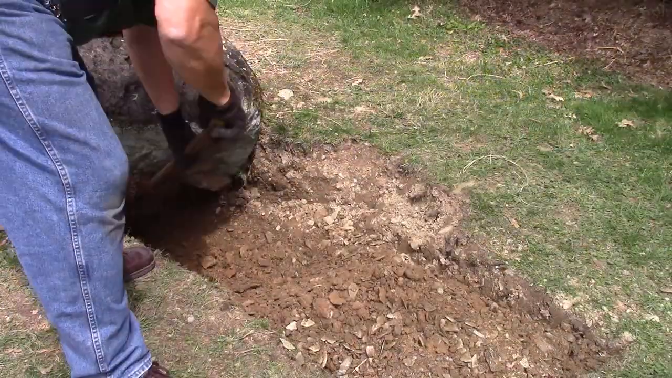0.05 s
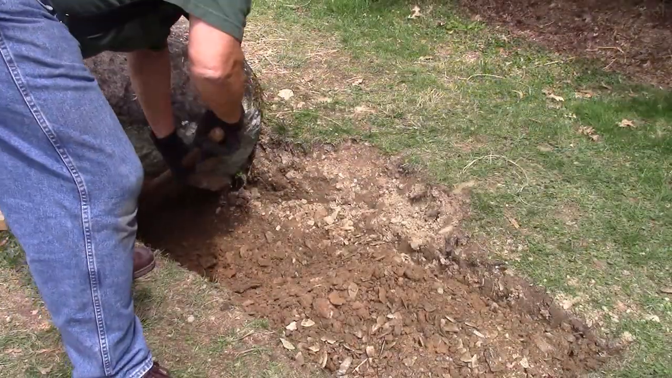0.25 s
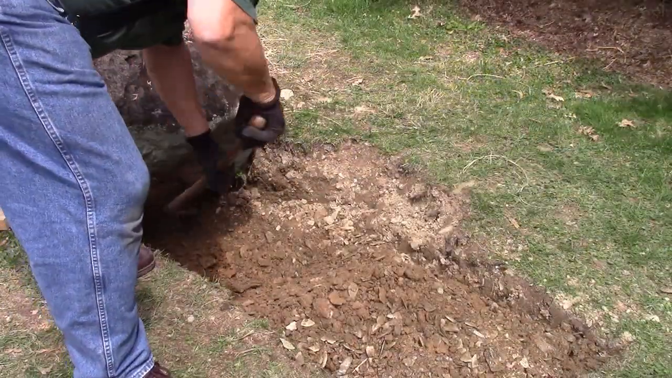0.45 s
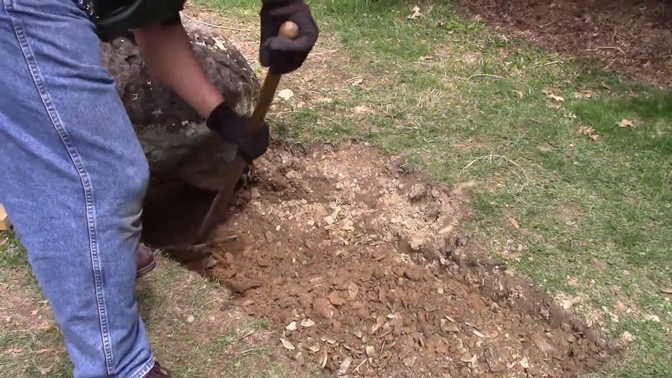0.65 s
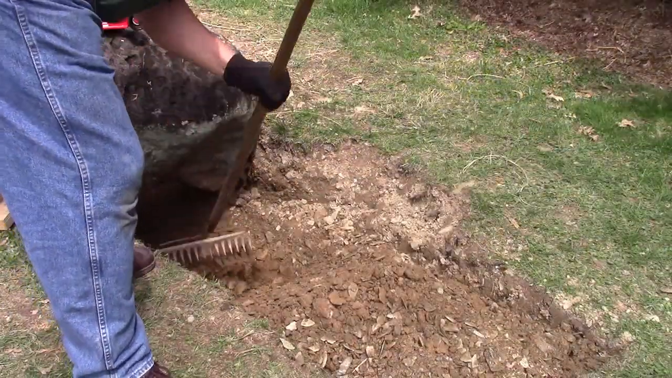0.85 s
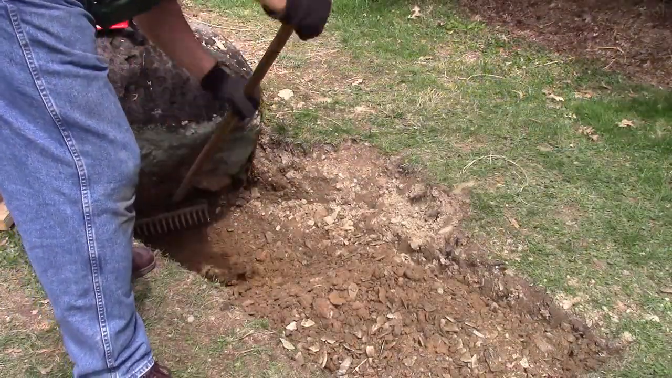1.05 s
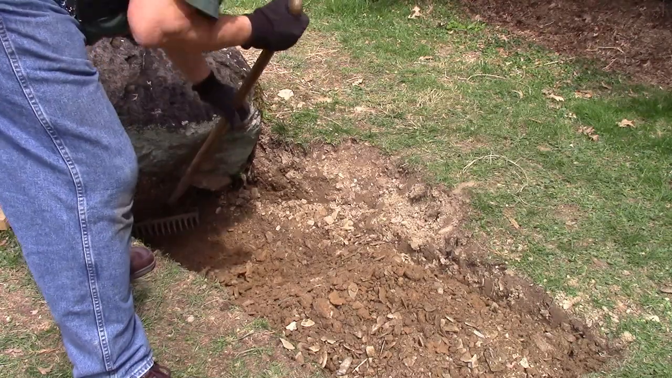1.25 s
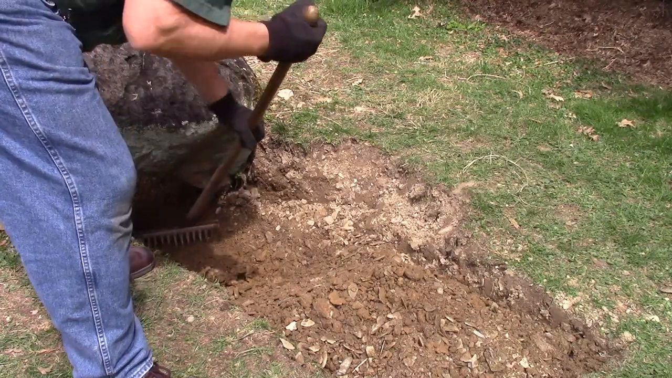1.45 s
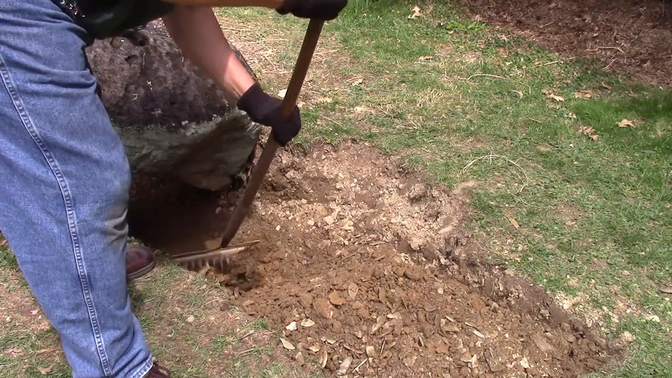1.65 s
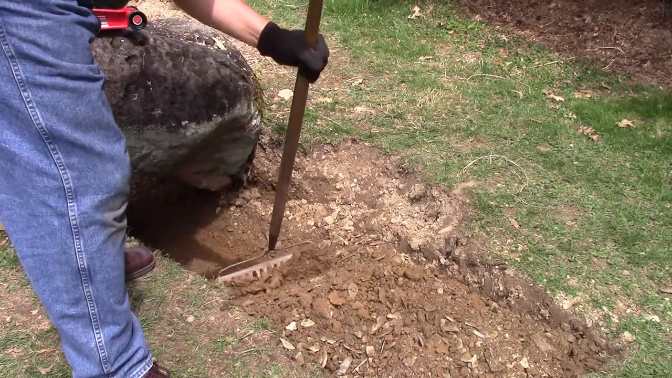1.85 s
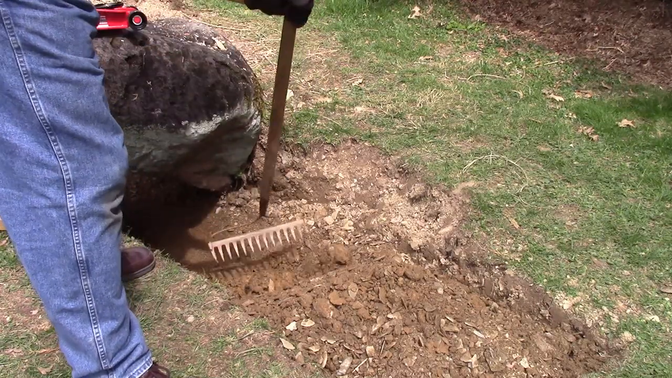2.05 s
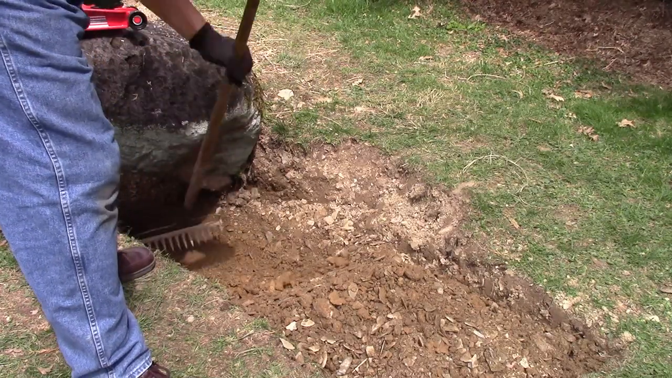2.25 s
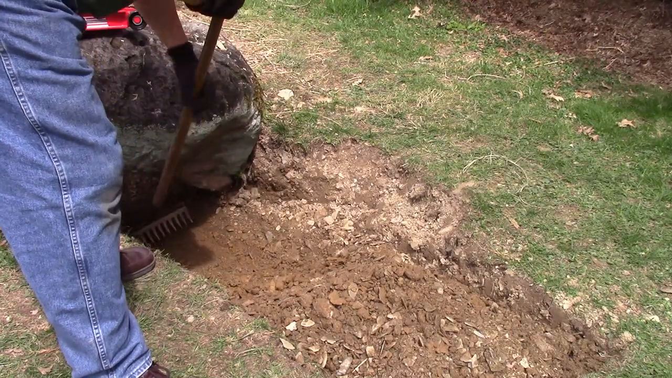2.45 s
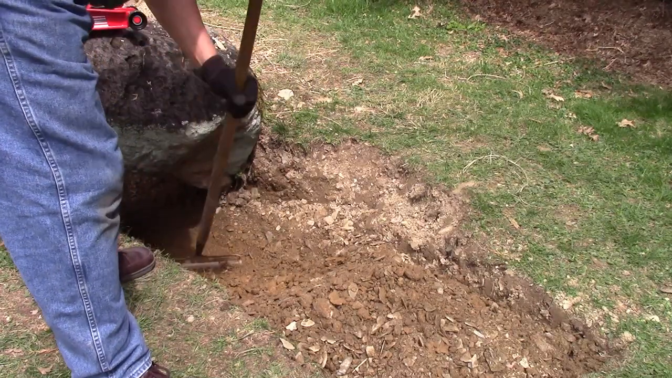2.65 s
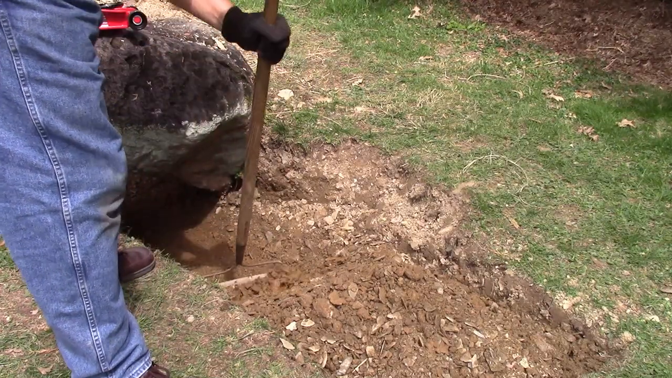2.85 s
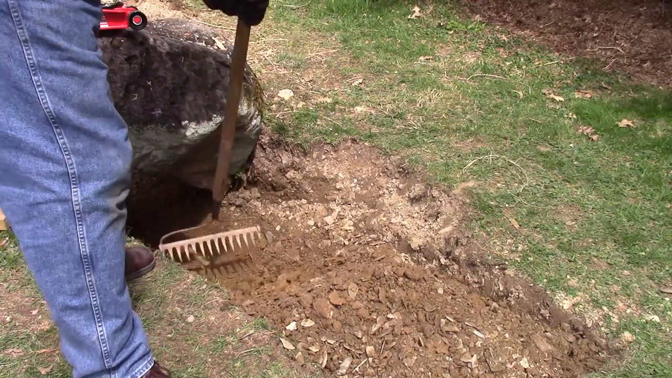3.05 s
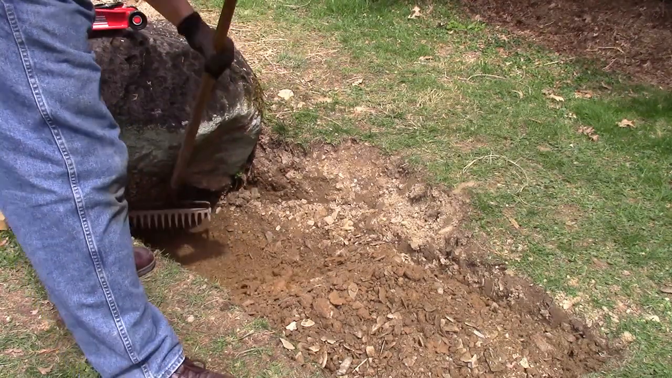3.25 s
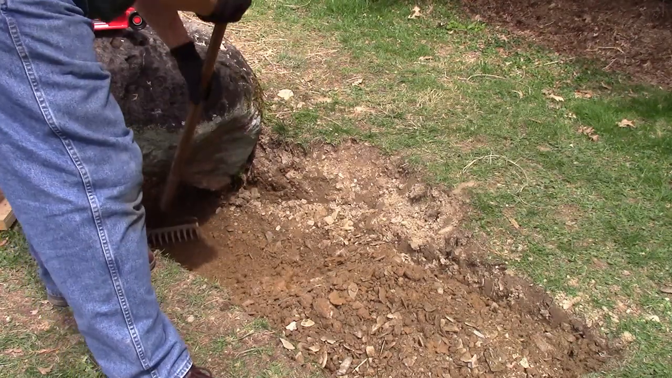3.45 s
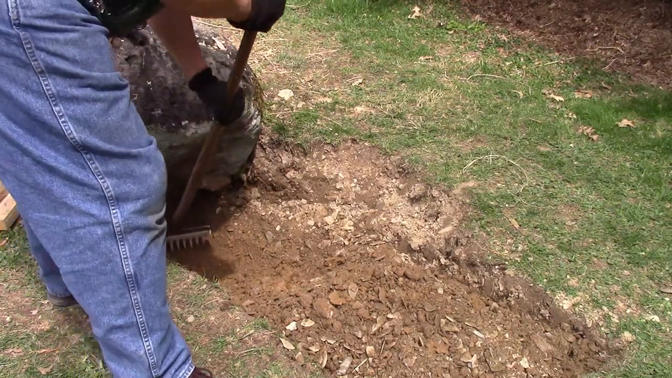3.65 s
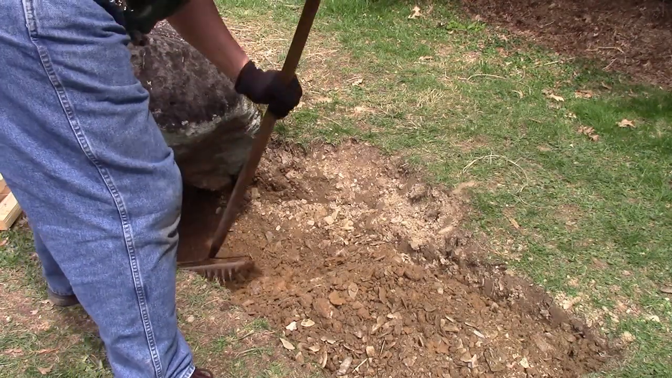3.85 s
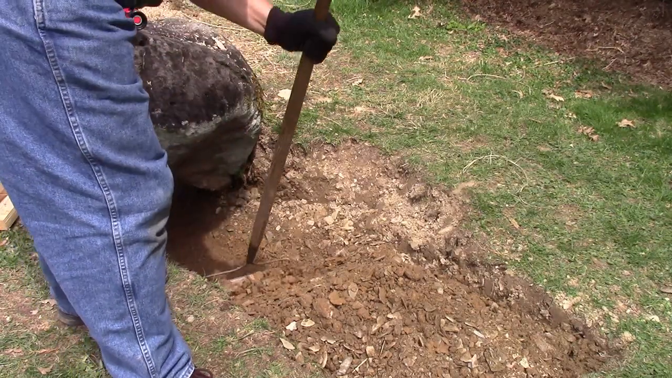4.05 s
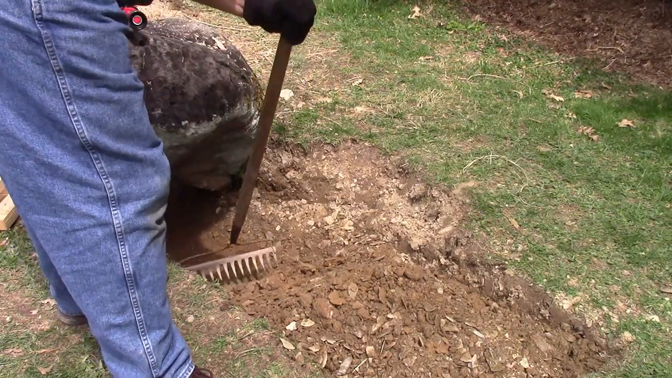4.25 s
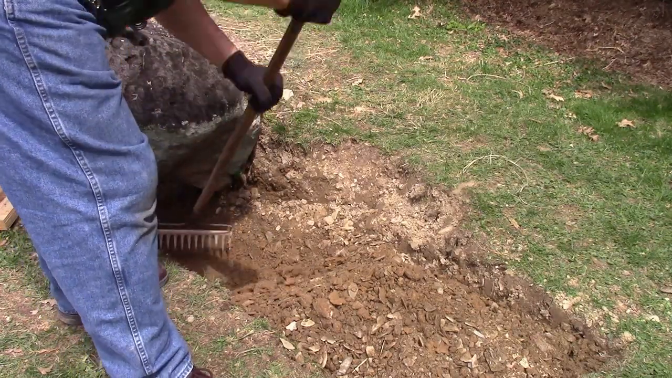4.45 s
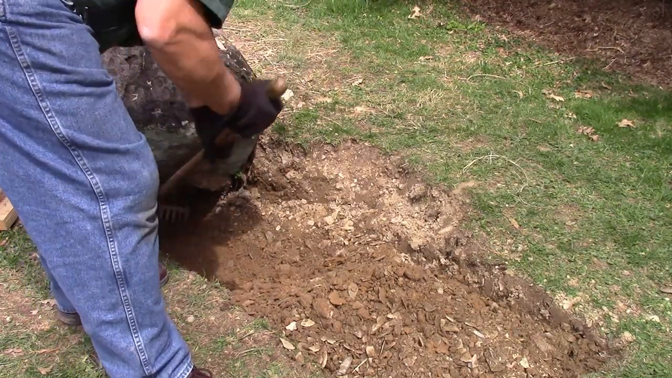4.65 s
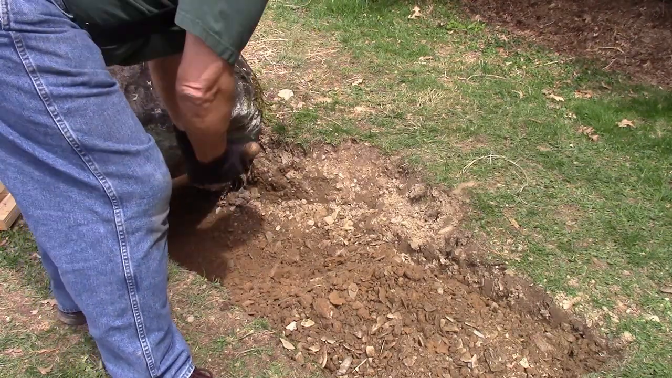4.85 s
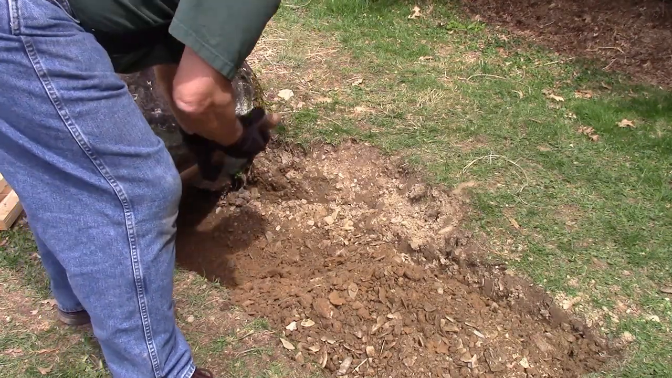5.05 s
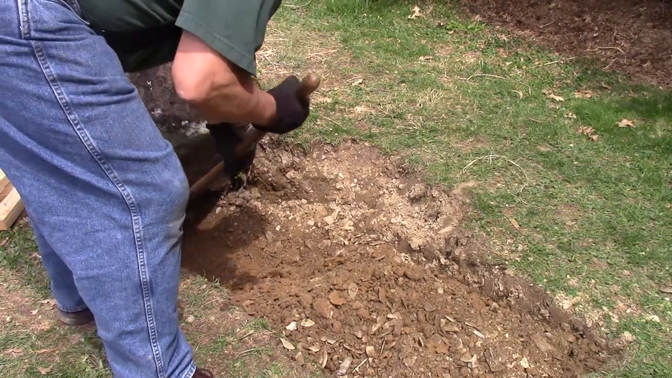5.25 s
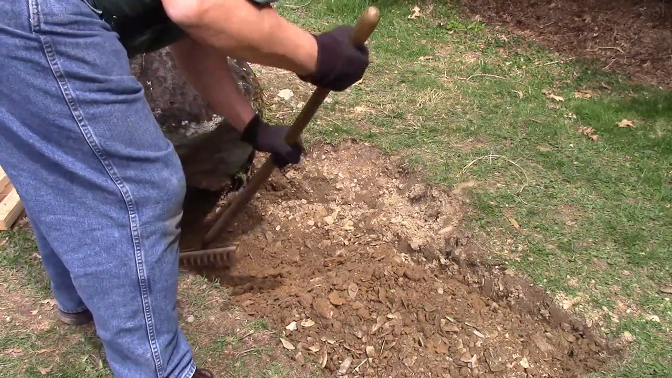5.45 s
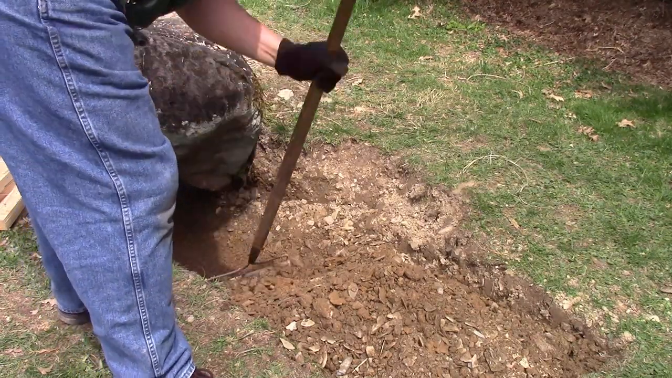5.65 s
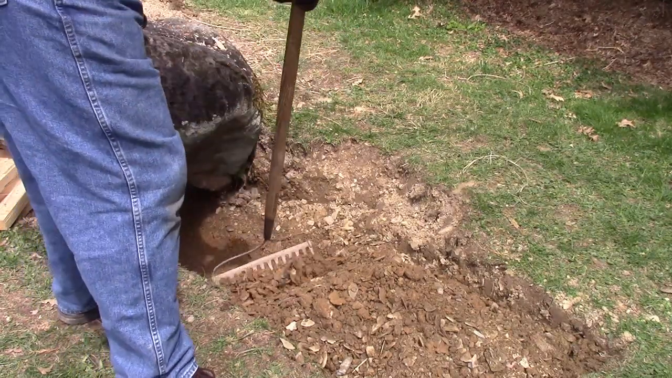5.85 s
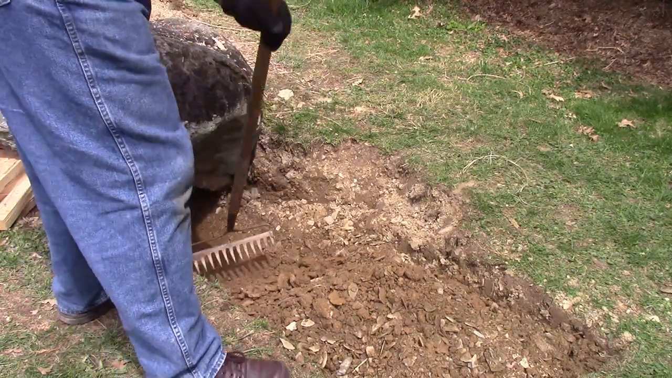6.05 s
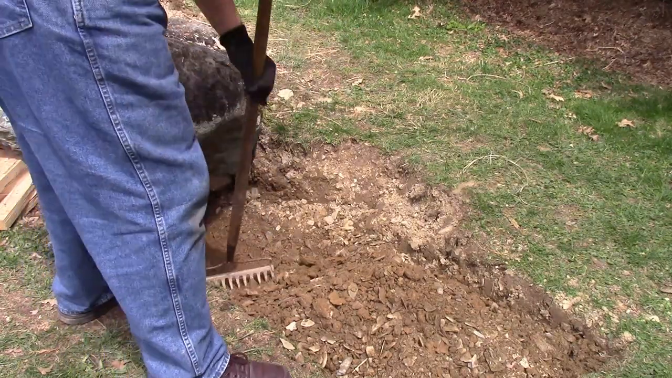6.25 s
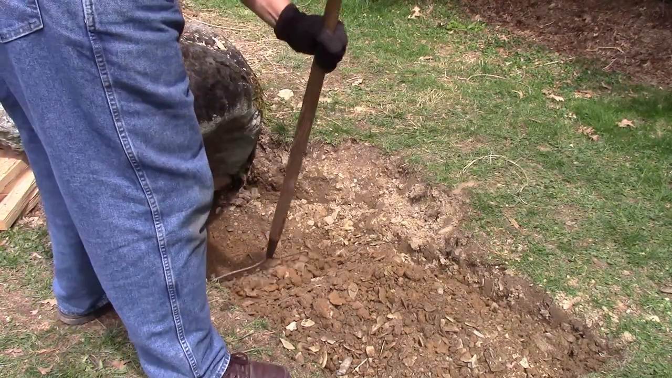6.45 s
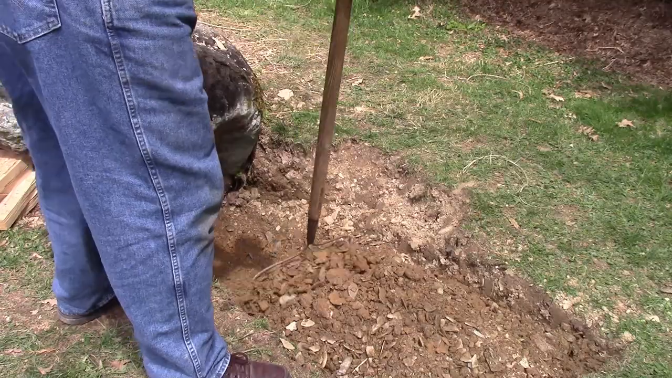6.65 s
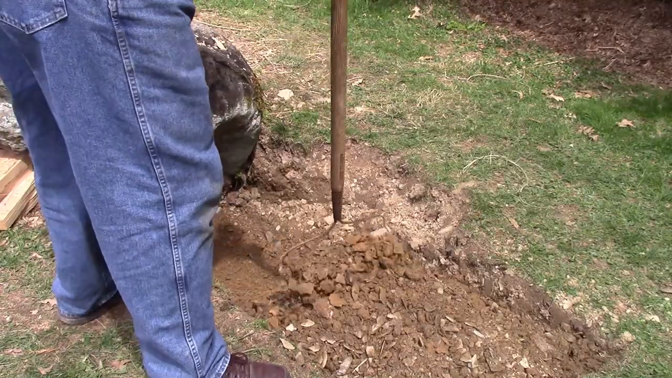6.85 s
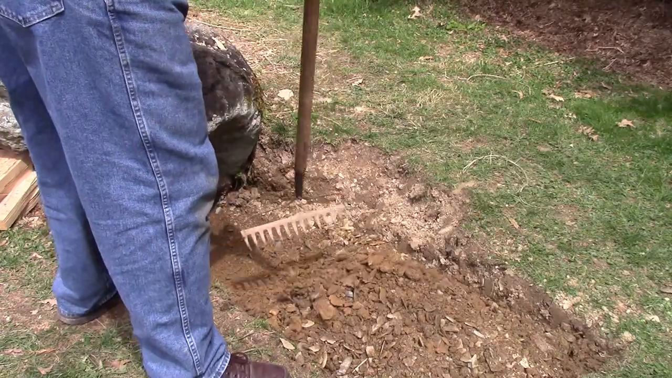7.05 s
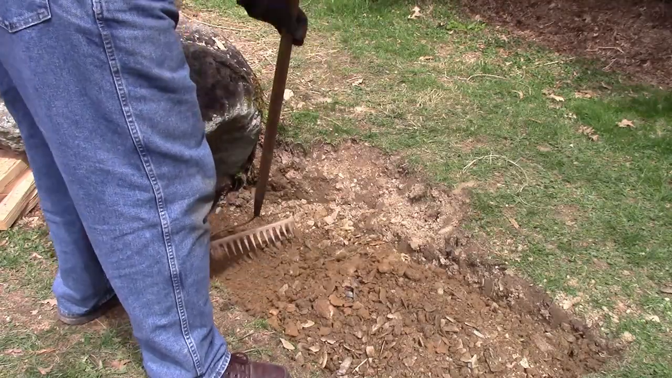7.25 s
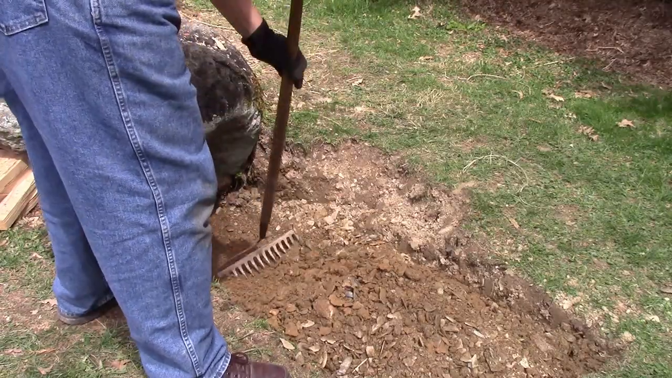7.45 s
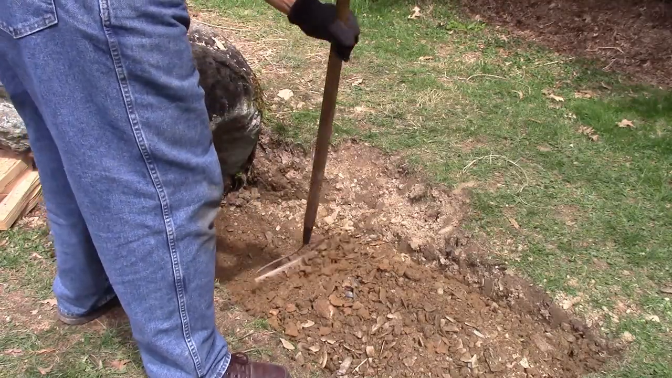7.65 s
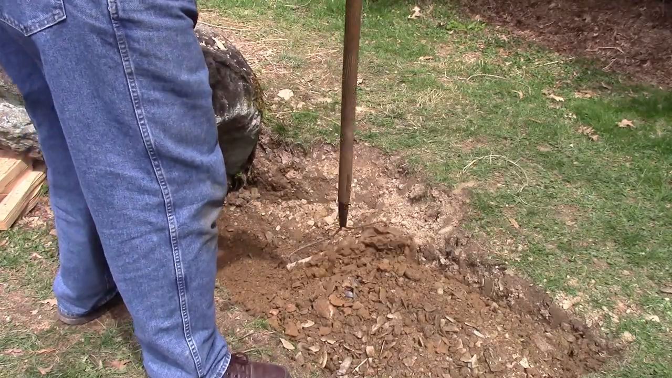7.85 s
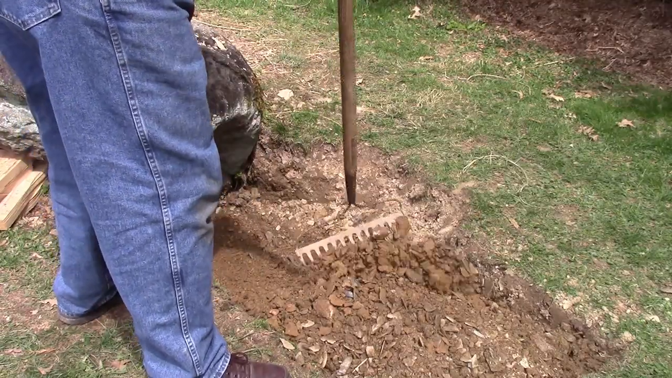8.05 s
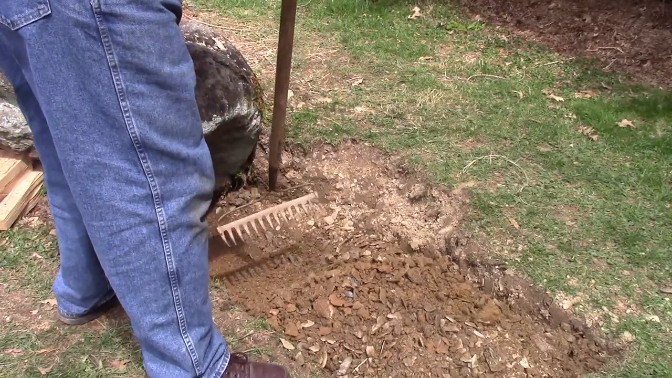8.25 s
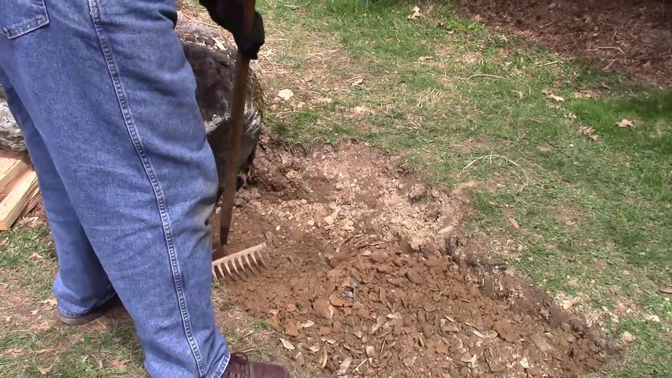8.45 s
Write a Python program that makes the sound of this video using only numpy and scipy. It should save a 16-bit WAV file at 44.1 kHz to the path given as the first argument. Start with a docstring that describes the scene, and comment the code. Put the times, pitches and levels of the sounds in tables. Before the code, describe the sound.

A steel garden rake scrapes through loose, stony soil in repeated strokes, tines clinking on stones, grit hissing and pebbles ticking down outdoors.

```python
"""A steel garden rake is dropped into loose soil and pulled back through clods and small stones, stroke after stroke.
From the first pull tines scrape and catch on stones, ringing the head in short tones; soil thuds and grit hisses.
At 2 s the back bar sings on thinly; from 3 s a far bird, an arched tone hoarse with noise, repeats its call.
Airy whistles pass after 4 s, and from about 6 s pebbles, cracks with very short rings, tick thickly as they fall.
A close pair of microphone ports hears it a little from the left, over a faint outdoor rumble and hiss."""
import sys
import numpy as np
from scipy import signal
from scipy.fft import rfft, irfft
from scipy.io import wavfile
from scipy.ndimage import uniform_filter1d

SR = 44100
rng = np.random.default_rng(int(sys.argv[2]) if len(sys.argv) > 2 else 0)


def transcribe(signal):
    """Save signal, clipped to [-1, 1], as a 16-bit WAV file at the path in sys.argv[1]."""
    frames = np.atleast_2d(signal).T
    limited = np.clip(frames, -1, 1)
    pcm = np.round(limited * 32767).astype(np.int16)
    wavfile.write(sys.argv[1], SR, pcm)


N = 375291

# modes of head and tines, damped by soil: (frequency [Hz], relative level [dB], 60 dB decay time [s])
RAKE_MODES = [(474, -39, 0.22), (730, -33, 0.24), (763, -45, 0.3), (935, -37, 0.27), (1010, 6, 0.034),
              (1158, 7, 0.028), (1387, -11, 0.047), (1502, -8, 0.078), (1670, 1, 0.032),
              (1840, -12.5, 0.025), (2117, -0.5, 0.017), (2343, 1, 0.046), (2520, -38, 0.033),
              (2814, 3, 0.029), (3110, 0, 0.021), (3392, -5, 0.098), (3580, 0, .04), (4220, -3, 0.064),
              (4890, -5.5, 0.057), (6100, -39, 0.06), (7580, -43, .05), (7300, -51, 0.066)]
# loose soil trickling off the heap: (time [s], hiss level [dB], pebble rate [1/s])
SOIL_TRICKLE = [(0, -54, .5), (1.0, -55, 1.5), (1.45, -70, .5), (2.1, -71, .3), (2.55, -72, .3),
                (3.1, -53, .5), (3.6, -63.5, .5), (4.2, -54, 2.5), (4.65, -68, 0.56), (5.0, -58.5, .5),
                (5.85, -52, 5), (6.15, -57.5, 4.5), (6.75, -47, 13), (7.3, -54, 44), (7.47, -57.5, 9.7),
                (7.95, -45.5, 25), (8.3, -52.5, 36), (8.51, -67, 7.3)]


def undb(db):
    """Amplitude factor of a level in dB."""
    return 10 ** (np.asarray(db) / 20)


def level(x, db):
    """Bring x to an RMS level in dB."""
    return x * undb(db) / np.sqrt(np.mean(x ** 2))


def over_hz(table):
    """A (Hz, value) table read at every bin of the whole-length spectrum."""
    hz, value = np.transpose(table)
    bins_hz = np.fft.rfftfreq(N, 1 / SR)
    return np.interp(np.log(bins_hz + 1), np.log(hz), value)


def colour(x, table):
    """Shape the spectrum of x by a (Hz, dB) table."""
    return irfft(rfft(x) * undb(over_hz(table)), N)


def band(x, hz, width_hz):
    """Two-pole resonance, gain 1 at the centre."""
    return signal.lfilter(*signal.iirpeak(hz, hz / width_hz, fs=SR), x)


def ring(x, hz, t60):
    """One decaying mode, with the same energy whatever its decay."""
    r = np.exp(-np.log(1000) / (t60 * SR))
    pole = r * np.exp(2j * np.pi * hz / SR)
    return np.sqrt(1 - r) * signal.lfilter([1], [1, -pole], x).imag


def walk(rate):
    """Random levels held 1 / rate s and slewed; spread near 1."""
    k = int(SR / rate)
    steps = np.repeat(rng.standard_normal(N // k + 1), k)
    return uniform_filter1d(steps, k // 2)[:N]


def grains(rate, spread_db):
    """Scattered clicks of either sign at rate per second, most of them small, a few large."""
    when, size, sign = rng.random((3, N))
    height = undb(-spread_db * np.log(size + 0.0059))
    return (when < rate / SR) * np.sign(sign - .5) * height


def add(out, s, x):
    """Mix x into out from time s [s], cut at the end."""
    i = int(s * SR)
    out[..., i:i + x.shape[-1]] += x[..., :N - i]


def drag():
    """Soil and stones rub past the tines in jerks: they ring the head, hiss as grit and thud through the handle."""
    # spectrum of the grit: (frequency [Hz], relative density [dB per Hz])
    grit_colour = [(880, 6.5), (1500, 0), (2590, -4), (2800, -0.5), (3770, -3.5), (7540, -8.5),
                   (11000, -11.5), (16000, -29)]
    spurt_db, grain_spread_db, tine_change_db = 4.5, 2.0, 3.0
    scrape_gain, grit_gain, thud_gain = strokes()
    jerk = undb(1.8 * walk(50) + 2.6 * walk(160))
    rub = level(grains(4000, 3.5) * jerk, 0) * scrape_gain

    # the touching tine keeps changing, so every mode comes and goes alone
    head = np.zeros(N)
    for hz, db, t60 in RAKE_MODES:
        touch = undb(tine_change_db * walk(25))
        head += undb(db) * ring(rub * touch, hz, t60)

    # grains of each size slide in their own spurts, with crumbs rattling among them
    dust = colour(grains(2000, grain_spread_db), grit_colour) * jerk
    grit = np.zeros(N)
    for hz in 1500 * 2 ** np.arange(0, 3.6, .5):
        grit += band(dust * undb(spurt_db * walk(90)), hz, hz / 3)
        grit += undb(-9.0) * band(dust * crumbs(), hz, hz / 8)

    low_thud = band(band(rng.standard_normal(N), 221, 110), 178, 153)
    upper_thud = band(band(rng.standard_normal(N), 480, 330), 460, 350)
    thud = (low_thud + undb(-2.5) * upper_thud) * jerk
    soil = band(band(rub, 990, 1170), 990, 1170)
    scrape = undb(-12.5) * head + undb(7.5) * soil
    return scrape + grit_gain * level(grit, 0.26) + thud_gain * level(thud, -12.0)


def crumbs(rate=14):
    """Crumbs and chips break loose at random moments; each rattles for a few milliseconds."""
    breaks = 3 * np.abs(grains(rate, 3.0))
    return signal.lfilter([1], [1, -np.exp(-1 / (.004 * SR))], breaks)


def strokes():
    """Levels of scrape, grit and thud: each stroke rises, holds and falls, over what still trickles at rest."""
    # the head moving through soil, long pulls and short drops: (start [s], rise [s], hold [s], fall [s],
    # scrape drive [dB], grit drive [dB], thud drive [dB])
    pulls = [(0.051, 0.031, 0.089, 0.094, -37.5, -39.5, -37.5),
             (0.356, 0.23, 0.11, 0.21, -31, -33.5, -24.5), (1.194, 0.043, 0.019, 0.14, -49.5, -49, -38.5),
             (1.457, 0.081, 0.12, 0.33, -35.5, -37, -27), (1.813, .05, 0.061, 0.19, -37.5, -41, -67),
             (2.379, 0.051, 0.024, 0.07, -41, -42, -35.5), (2.575, 0.079, 0.2, 0.2, -34.5, -39, -29.5),
             (3.386, 0.049, 0.014, 0.16, -37.5, -59, -21.5), (3.607, 0.18, 0.25, 0.11, -35.5, -44, -26.5),
             (4.793, 0.065, .1, 0.074, -52, -53.5, -41.5), (5.102, 0.27, 0.31, 0.13, -37.5, -39, -31.5),
             (6.294, 0.12, 0.023, .11, -28.5, -34.5, -41), (6.575, 0.062, 0.052, .08, -43.5, -56, -70),
             (7.353, 0.034, 0.034, 0.065, -51, -57, -42), (7.466, 0.057, 0.17, 0.18, -41, -50.5, -45)]
    ramp_db = 29  # climbed during the rise, lost during the fall
    grit_grows_db, thud_fades_db = 6, 4  # across the hold: the head speeds up and rides out of the soil
    surge_db, surges_per_s = 3, 40  # the pull is uneven
    rest_scrape_db, rest_thud_db = -64, -54.5  # between strokes
    t = np.arange(N) / SR
    trickle_s, hiss_db, _ = np.transpose(SOIL_TRICKLE)
    rest_hiss = undb(np.interp(t, trickle_s, hiss_db))
    out = np.array([np.full(N, undb(rest_scrape_db)), rest_hiss, np.full(N, undb(rest_thud_db))])
    surge = undb([surge_db * walk(surges_per_s) for _ in range(3)])
    for s, rise, hold, fall, scrape_db, grit_db, thud_db in pulls:
        corners = np.cumsum([s, rise, hold, fall])
        i, j = int(s * SR), int(corners[-1] * SR)
        shape_db = np.interp(t[i:j], corners, [-ramp_db, 0, 0, -ramp_db])
        progress = np.interp(t[i:j], corners[1:3], [-.5, .5])
        drive_db = np.array([
            np.full(j - i, scrape_db),
            grit_db + grit_grows_db * progress,
            thud_db - thud_fades_db * progress,
        ][:3]) if len(progress) == j - i else 0
        out[:, i:j] += surge[:, i:j] * undb(shape_db + drive_db)
    return out


def knocks():
    """Each catch is a short rough contact: the struck tine rings clearly, the whole head faintly, the soil crunches."""
    # the clearest catches of a tine on a stone: (time [s], level [dB], struck tine [Hz],
    # its ring re level [dB], treble re level [dB], contact length [s])
    catches = [(0.065, -20, 1860, -1.5, 2, 0.021), (0.125, -20, 2270, -2, -13, 0.021),
               (0.171, -17, 3310, -4.5, -6.5, 0.029), (0.459, -27.5, 2060, -8, -2, 0.043),
               (0.514, -24, 2270, 3, -4, .014), (0.56, -17, 2810, 2, -5, 0.0072),
               (0.583, -10.5, 863, -6.5, -24, 0.013), (0.63, -10, 913, -10.5, -14, 0.013),
               (0.639, -12, 3380, -9, -14, 0.0079), (0.66, -16.5, 874, -10, -14, .014),
               (0.717, -15, 933, -9.5, -8, 0.012), (0.757, -25.5, 970, -9, -4, .015),
               (0.821, -22.5, 975, -9, -4, 0.021), (1.235, -25, 880, -7.5, -7, 0.02),
               (1.511, -26.5, 1000, -10, -2.5, 0.0097), (1.556, -14.5, 932, 1.5, -28, 0.0099),
               (1.622, -14, 950, -5, -14, 0.03), (1.719, -28.5, 888, 1.5, -24, 0.016),
               (1.755, -21, 900, -6.5, -23, 0.02), (1.803, -25, 1610, -9, -3, 0.015),
               (1.852, -34, 850, -2.5, -23, 0.0073), (1.877, -27.5, 768, -3.5, -4, 0.009),
               (1.914, -5, 1690, -10.5, -11, 0.01), (1.987, -20, 1476, 1.5, -37, 0.018),
               (1.99, -24.5, 780, 4.5, -37, 0.018), (2.404, -29.5, 1056, -7, -20, .021),
               (2.427, -21, 934, -7.5, -23, 0.02), (2.613, -25.5, 894, -6.5, -11, 0.016),
               (2.649, -24, 824, -6.5, -1.5, 0.018), (2.684, -20, 1670, -8, -24, .014),
               (2.734, -14.5, 1660, -12.5, -10, 0.021), (2.779, -32, 1060, 3, -21, .012),
               (2.843, -22, 1170, -1, -23, 0.008), (2.909, -32, 975, -8, -10, .008),
               (2.937, -34, 1000, -8, -15, .008), (3.049, -19.5, 2980, -8, -26, 0.022),
               (3.061, -32, 1193, 5.5, -30, 0.025), (3.223, -37.5, 1300, -10, -30, 0.03),
               (3.401, -0.5, 1384, -11.5, -26, 0.022), (3.497, -20.5, 980, -7, -9.5, 0.029),
               (3.676, -41.5, 922, 11.5, -25, 0.018), (3.727, -29.5, 803, 0, -22, 0.0092),
               (3.765, -20, 948, 2, -34, 0.0024), (3.866, -14.5, 926, -4, -28, .0073),
               (3.903, -22, 1035, 2, -25.5, 0.0088), (3.942, -18.5, 917, -9, -21, 0.011),
               (3.979, -16.5, 1380, -13, -6, 0.0088), (4.006, -19.5, 1610, -3.5, -5, 0.0094),
               (4.021, -14, 917, -9.5, -8.5, 0.011), (4.203, -23, 2000, -13, 4, 0.0057),
               (4.829, -23, 2210, -9.5, -4, 0.029), (4.911, -24, 2874, -4.5, -22, 0.024),
               (5.151, -29, 2800, -11, -18, 0.018), (5.203, -25.5, 964, -15, -13, 0.021),
               (5.243, -32, 1790, -3, -2, .009), (5.272, -18.5, 944, -14, -19, 0.026),
               (5.34, -30, 2090, -5, -1, .009), (5.386, -22.5, 1430, -6, -9, 0.0069),
               (5.484, -9.5, 880, -18, -9, 0.0089), (5.555, -26.5, 1300, 0.5, -23, 0.012),
               (5.605, -15, 2745, -4.5, 0.5, .011), (5.644, -13, 818, -8.5, 0.5, 0.009),
               (5.679, -14.5, 1200, -3.5, -14, 0.022), (5.778, -26, 1090, -8, -20, 0.012),
               (6.246, -28, 650, -9, -16, 0.019), (6.307, -26, 1000, -16, -28, 0.0083),
               (6.393, -16.5, 1150, -13, -18, 0.042), (6.426, -14, 1453, -10, -1, 0.014),
               (6.564, -10, 1440, -16, -38, 0.005), (6.593, -34.5, 3230, -0.5, -8, .011),
               (6.646, -31.5, 1415, 0, -13, 0.018), (7.385, -12, 2910, -15, -12, 0.024),
               (7.538, -22.5, 894, -6, -9.5, 0.038), (7.571, -12, 1070, -8, -8, 0.032),
               (7.636, -22, 1160, -7, -12, .0066), (7.776, -22.5, 1450, -3.5, -25, 0.011),
               (8.127, -28, 1450, -17, -10, 0.0091)]
    tine_t60 = 0.065  # s at 1 kHz for a ring at 0 dB; higher tines die sooner
    free_tine = .4  # a louder tine is freer of soil and rings longer: dB of decay time per dB
    strike_s = 0.012  # the tine takes its blow early in the contact
    out, t = np.zeros(N), np.arange(SR // 5) / SR
    for s, db, tine_hz, tine_db, treble_db, length in catches:
        noise = rng.standard_normal((2, len(t)))
        onset = 1 - np.exp(-(t / 0.0015) ** 2)
        fade = np.exp(-(t / max(length, .001)) ** 2.25) + undb(-28.0) * np.exp(-t / 0.051)
        push, treble_push = onset * fade * noise

        crunch = band(band(push, 1060, 1400), 1060, 1400)
        head = sum(undb(mode_db) * ring(push, hz, t60) for hz, mode_db, t60 in RAKE_MODES)
        treble = band(band(treble_push, 3100, 5320), 3400, 6000)
        t60 = tine_t60 * (1000 / tine_hz) ** 0.63 * undb(free_tine * tine_db)
        tine = ring(push * np.exp(-t / strike_s), tine_hz, t60)

        parts = [(crunch + undb(-20.0) * head, -4.0), (treble, treble_db), (tine, tine_db)]
        add(out, s, sum(undb(db + part_db) * part / np.abs(part).max() for part, part_db in parts))
    return out


def clods():
    """A dull puff of low noise for each clod."""
    # clods giving way under the head: (time [s], peak level [dB], nominal length [s])
    breaks = [(0.195, -34, .03), (0.47, -33, .04), (0.64, -14, .03), (0.72, -22, 0.022), (1.57, -37, .03),
              (1.66, -22.5, .04), (2.79, -31, .03), (3.786, -32, .04), (3.876, -16.5, 0.024),
              (4.115, -38, .03), (5.43, -34, .03), (5.495, -20, 0.032), (5.561, -17, 0.031)]
    out, t = np.zeros(N), np.arange(SR // 8) / SR
    for s, db, length in breaks:
        puff = rng.standard_normal(len(t)) * (t / length) * np.exp(-3 * t / length)
        puff = band(band(puff, 188, 140), 188, 140) + undb(-4.5) * band(puff, 404, 170)
        add(out, s - length / 2, undb(db) * puff / np.abs(puff).max())
    return out


def ticks():
    """A pebble's click: a millisecond of broad crack and a very short ring; small ones fall at random with the trickle."""
    # the clearest pebbles falling on pebbles: (time [s], peak level [dB], pitch [Hz], relative ring [dB])
    clear_pebbles = [(0.0944, -28, 3870, 8), (0.7248, -17, 4610, 10), (0.837, -14.5, 5900, -2),
                     (1.919, -10, 5930, -2), (2.9141, -19.5, 3620, -19), (3.981, -20, 5140, -16),
                     (4.076, -27, 4710, -21), (4.4578, -21.5, 3570, -20), (5.694, -13, 7650, -4),
                     (5.7046, -16, 7830, 11), (5.9481, -24, 6090, -4), (6.7152, -26, 8050, 15),
                     (6.9368, -24, 9500, 2), (7.0764, -15, 5900, 15), (7.087, -26, 6530, 11),
                     (7.113, -23, 10400, -14), (7.126, -26, 7400, -9), (7.15, -24, 4840, -15),
                     (7.206, -26, 3940, -6), (7.2553, -21.5, 8050, -23), (7.268, -22.5, 4320, -16),
                     (7.359, -23.5, 4150, -1), (7.385, -17.5, 5320, 19), (7.5404, -12.5, 5310, 1),
                     (7.579, -8.5, 5600, -14), (7.6156, -10, 4230, -26), (7.6415, -21, 4500, -1),
                     (7.902, -28, 6300, -6), (7.9203, -20.5, 3900, -9), (8.1804, -23, 4570, -2),
                     (8.2467, -21.5, 8400, -8), (8.276, -25.5, 3520, -14), (8.311, -29, 4720, -14),
                     (8.345, -24.5, 7100, -16), (8.4274, -34, 4940, -19)]
    # the small pebbles of the trickle
    stray_db, stray_spread_db, stray_ring_db = -36.5, 3.5, -4.5
    stray_low_hz, stray_octaves = 4570, 1.2
    out, t = np.zeros(N), np.arange(SR // 25) / SR
    trickle_s, _, rate = np.transpose(SOIL_TRICKLE)
    slots = np.arange(0, N / SR, .01)  # at most one stray in each 10 ms
    luck, late, size, pitch = rng.random((len(slots), 4)).T
    falls = luck < np.interp(slots, trickle_s, rate) / 100
    stray_s = (slots + late / 100)[falls]
    peak_db = (stray_db - stray_spread_db * np.log(size + 0.13))[falls]
    stray_hz = (stray_low_hz * 2 ** (stray_octaves * pitch))[falls]
    strays = [(s, db, hz, stray_ring_db) for s, db, hz in zip(stray_s, peak_db, stray_hz)]
    for s, db, hz, ring_db in [*clear_pebbles, *strays]:
        crack = rng.standard_normal(len(t)) * np.exp(-t / .0007)
        snap = band(band(crack, hz, 1.3 * hz), 5300, 12000)
        click = snap + undb(ring_db) * ring(crack, hz, 0.018)
        add(out, s, undb(db) * click / np.abs(click).max())
    return out


def bar():
    """The free back bar sings on, long and thin, once the head leaves the soil."""
    # modes of the bar: (frequency [Hz], relative level [dB], 60 dB decay time [s])
    bar_modes = [(1077, 0, 1.1), (1663, -8, .7), (2821, -12, 1.0)]
    # blows that leave the bar free to sing: (time [s], level [dB])
    lifts = [(1.995, -52)]
    blow = np.zeros(N)
    for s, db in lifts:
        blow[int(s * SR)] = undb(db)
    out = np.zeros(N)
    for hz, db, t60 in bar_modes:
        unit_peak = ring(signal.unit_impulse(99), hz, t60).max()
        out += undb(db) * ring(blow, hz, t60) / unit_peak
    return out


def whistles():
    """Bird notes and airy whistles: arched tones, the wide ones hoarse with noise."""
    # faint airy whistles: (time [s], length [s], pitch [Hz], width [Hz], level [dB])
    airy = [(4.337, 0.26, 1680, 120, -57), (4.28, .06, 2700, 150, -56), (6.935, .12, 3100, 370, -52),
            (7.002, .07, 4160, 300, -60), (8.051, 0.15, 2980, 450, -49)]
    # a far bird's repeated call: (time [s], level [dB])
    calls = [(2.956, -54.5), (4.13, -60), (5.105, -60.5), (6.223, -58.5), (7.159, -59), (8.189, -58)]
    # the notes of one call: (delay [s], length [s], mean pitch [Hz], width [Hz], mean level re call [dB])
    notes = [(0, 0.06, 4570, 140, 4), (0, 0.049, 4230, 150, 4), (0.054, .04, 4550, 150, 5),
             (0.075, .14, 3090, 400, 4.5)]
    bird = []
    for s, db in calls:
        for delay, length, hz, width_hz, note_db in notes:
            note_hz = hz * (1 + 0.0151 * rng.standard_normal())
            sung_db = db + note_db + 2.9 * rng.standard_normal()
            bird.append((s + delay, length, note_hz, width_hz, sung_db))
    out = np.zeros(N)
    for s, length, hz, width_hz, db in [*bird, *airy]:
        u = np.linspace(-1, 1, int(length * SR))
        smooth = np.exp(-np.pi * width_hz / SR)
        hoarse = signal.lfilter([1], [1, -smooth], rng.standard_normal(SR // 2))[-len(u):]
        glide_hz = hz * (1 - 0.0198 * u ** 2 - 0.0153 * u)
        tone = np.sin(2 * np.pi * np.cumsum(glide_hz) / SR)
        voiced = np.clip(1 - width_hz / 200, 0, 1)
        voice = tone * (voiced + (1 - voiced) * level(hoarse, 0))
        add(out, s, level(voice, db) * signal.windows.tukey(len(u), .5))
    return out


def yard():
    """Distant rumble and hiss that swell slowly."""
    # spectrum of the open air: (frequency [Hz], relative density [dB per Hz])
    air_colour = [(12, -34), (20, 7), (40, 0.5), (86, -5), (154, -0.5), (434, -18), (1220, -18),
                  (1440, -17), (2080, -19), (2910, -21), (9950, -30), (14700, -35.5), (16000, -34)]
    # likeness of the air at the two ports: (frequency [Hz], common share [0-1])
    air_alike = [(30, 1), (130, 0.28), (640, 0.62), (3100, 0.26), (15000, 0.037)]
    air = level(colour(rng.standard_normal(N), air_colour), -47.5)
    swell = undb(0.7 * walk(3))
    return irfft(ports(air * swell, air_alike, 0.33), N)


def ports(mid, alike, blur_s):
    """Both ports share part of the sound; the rest reaches each by short scattered paths that keep shifting."""
    share = np.clip(over_hz(alike), 0, 1)
    out = np.sqrt(share) * rfft(mid)
    fade = np.exp(-np.arange(N) / (blur_s * SR))
    for _ in range(3):
        paths = rng.standard_normal((2, N)) * fade
        paths = rfft(paths / np.sqrt(3 * np.sum(paths ** 2, axis=1, keepdims=True)))
        out = out + np.sqrt(1 - share) * paths * rfft(mid * walk(20))
    return out


def scene():
    """The rake and the whistles reach the left port a little earlier and louder; the yard lies around them."""
    # likeness of the rake at the two ports: (frequency [Hz], common share [0-1])
    rake_alike = [(300, 0.96), (1400, 1), (3100, 0.89), (7000, 0.76), (15000, 1)]
    # lean to the left: (frequency [Hz], left minus right [dB])
    left_db = [(300, 2), (1000, .5), (4000, 0.5), (12000, 2.5)]
    left_lead_s = 2.3e-5
    side = np.array([[.5], [-.5]])
    lead = np.exp(2j * np.pi * np.fft.rfftfreq(N, 1 / SR) * left_lead_s * side)
    rake = drag() + knocks() + clods() + bar() + ticks() + whistles()
    # so small a source radiates no deep bass
    rake = signal.sosfilt(signal.butter(4, 150, "high", fs=SR, output="sos"), rake)
    heard = ports(rake, rake_alike, 0.0009) * undb(over_hz(left_db) * side) * lead
    return irfft(heard, N) + yard()


def record(dry):
    """The recorder rounds the loudest peaks and cuts the top steeply."""
    ceiling, top_hz = .8, 15800  # ceiling in full scale
    rounded = ceiling * np.tanh(dry / ceiling)
    return signal.sosfilt(signal.ellip(10, .2, 70, top_hz, fs=SR, output="sos"), rounded)


dry = scene()
out = record(dry)
transcribe(out)
```